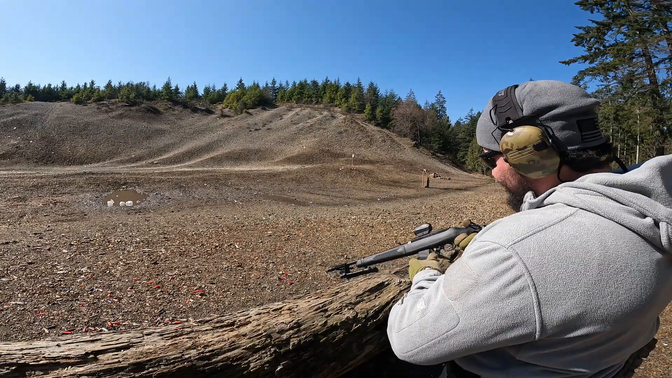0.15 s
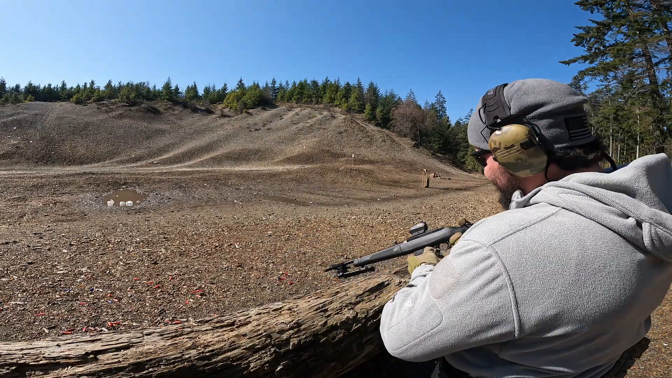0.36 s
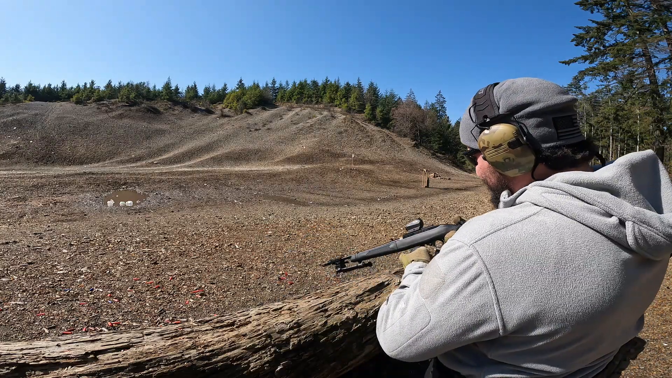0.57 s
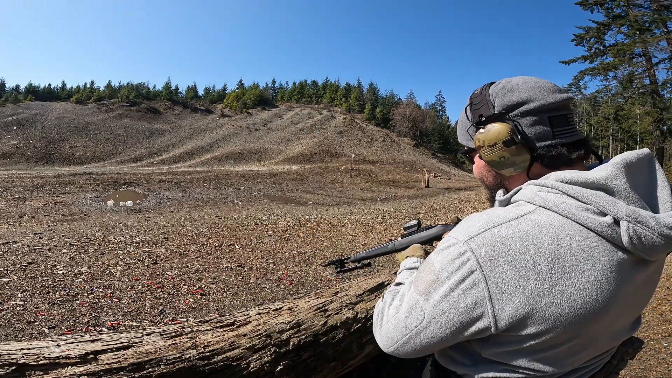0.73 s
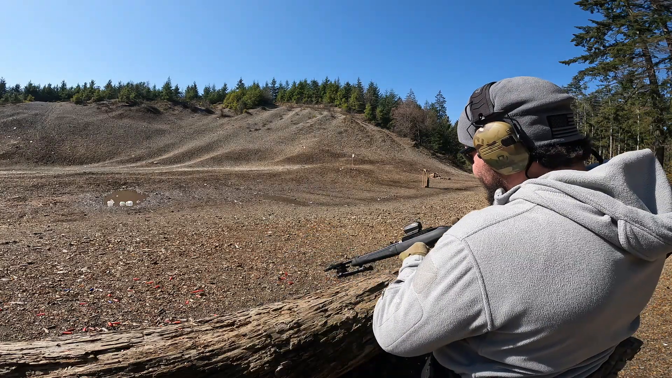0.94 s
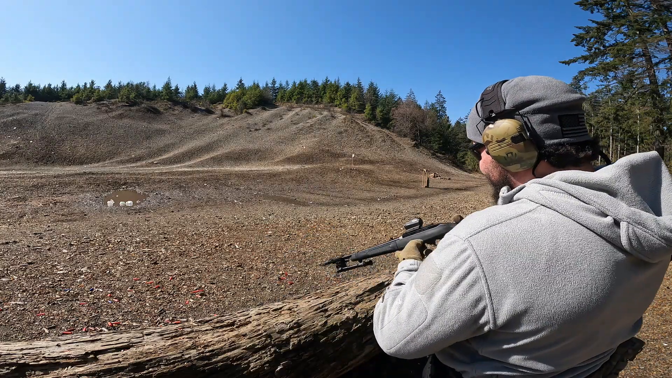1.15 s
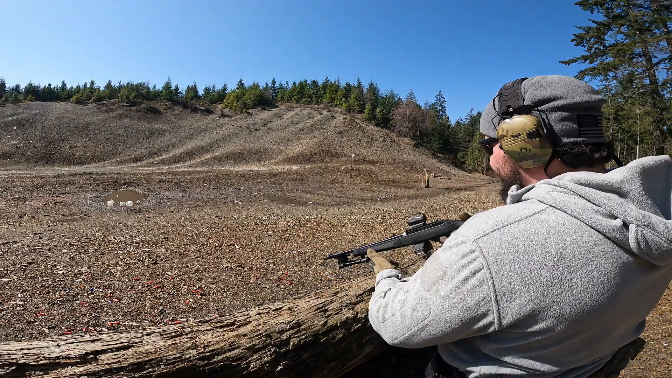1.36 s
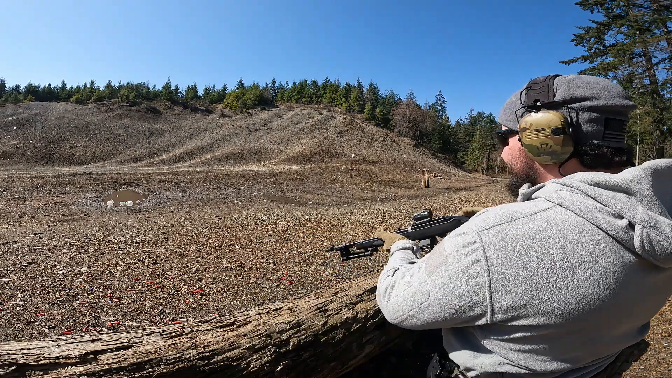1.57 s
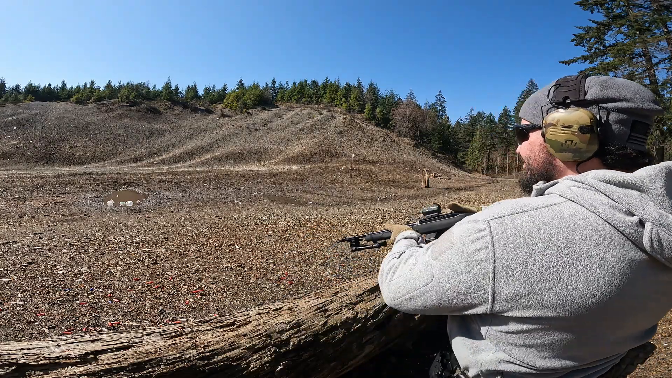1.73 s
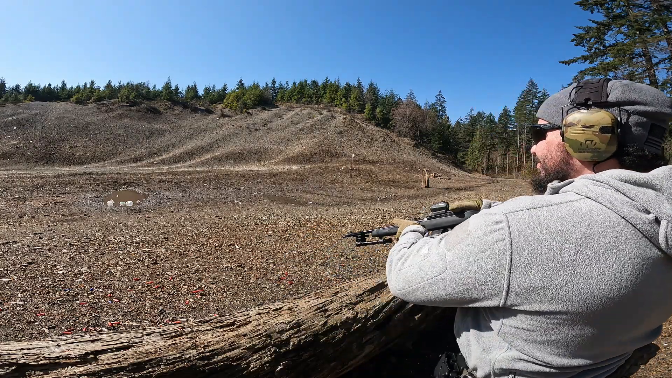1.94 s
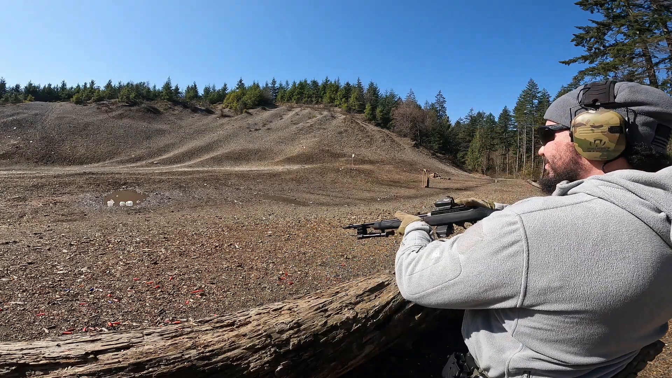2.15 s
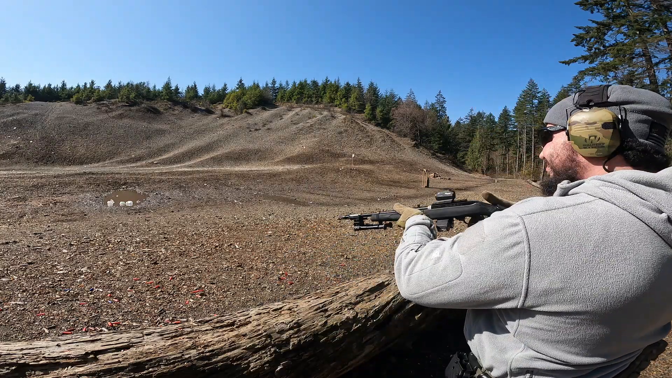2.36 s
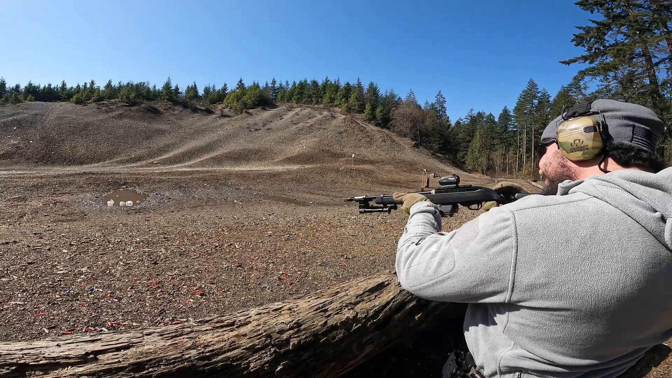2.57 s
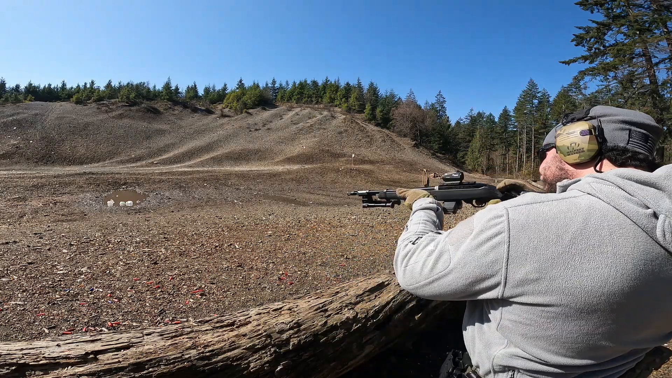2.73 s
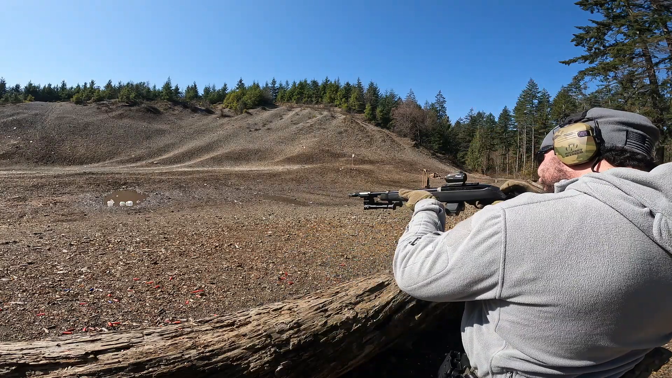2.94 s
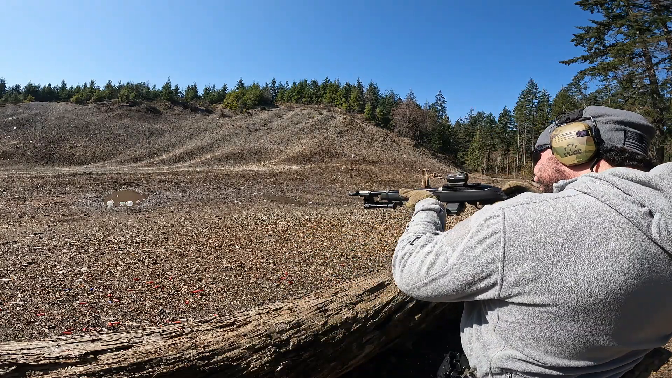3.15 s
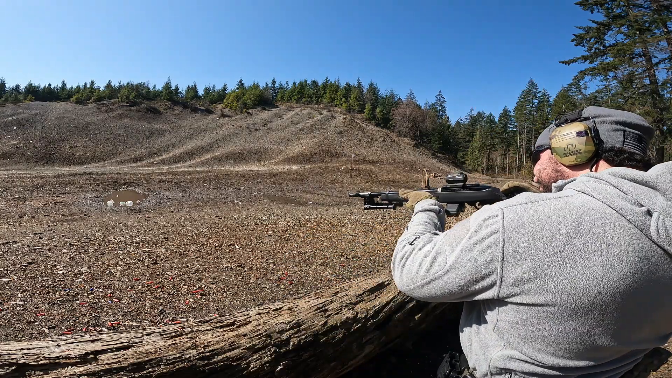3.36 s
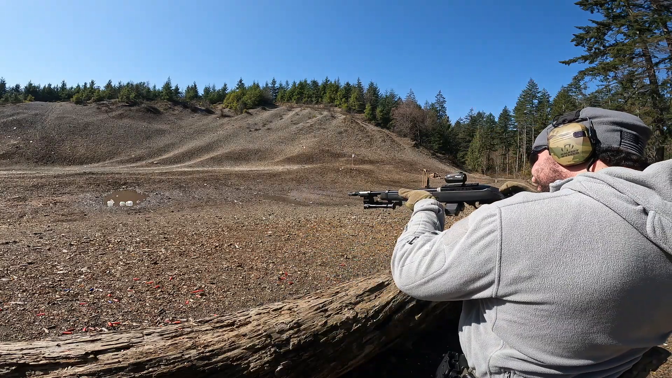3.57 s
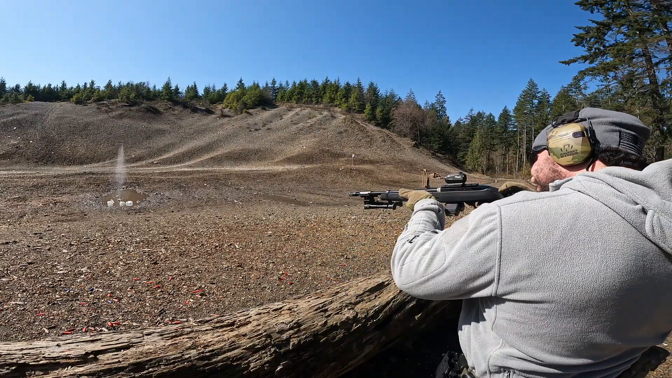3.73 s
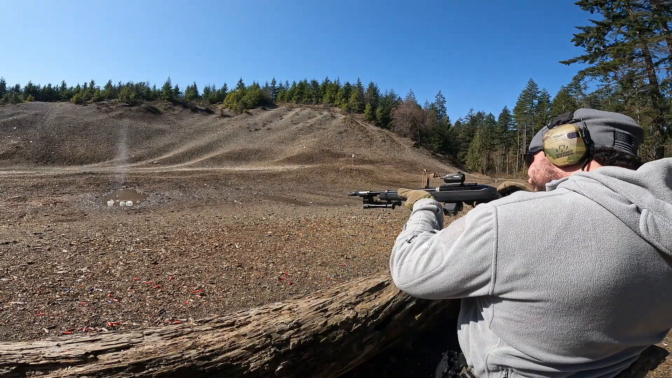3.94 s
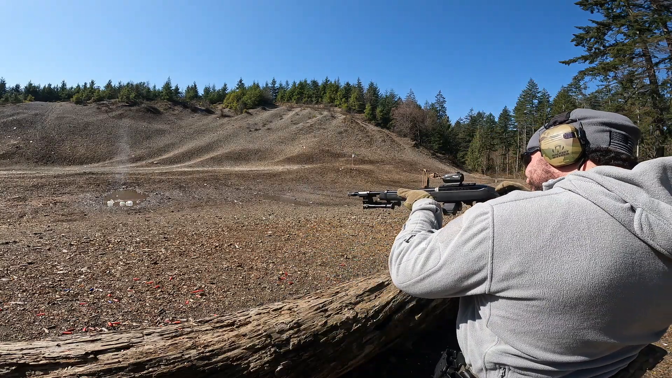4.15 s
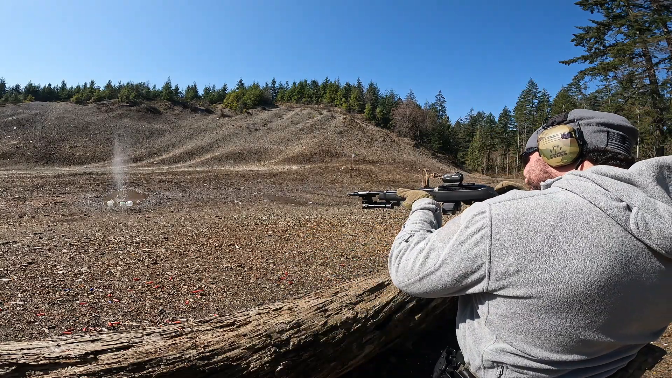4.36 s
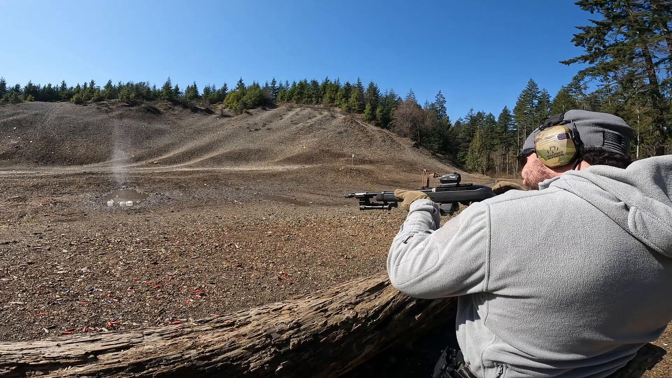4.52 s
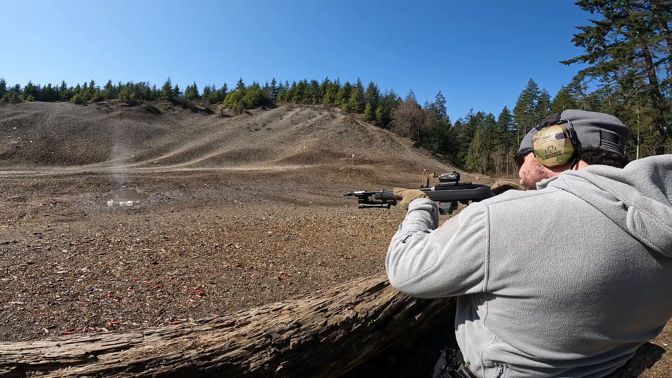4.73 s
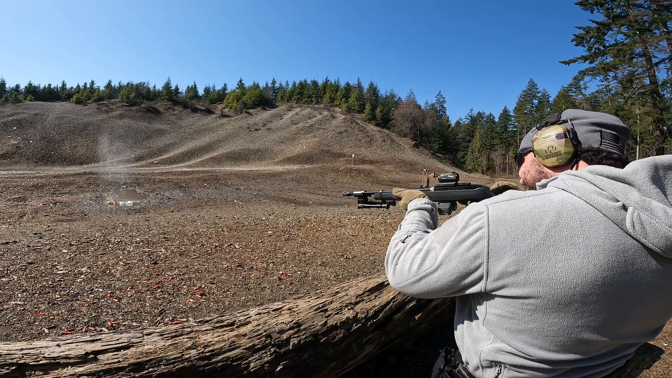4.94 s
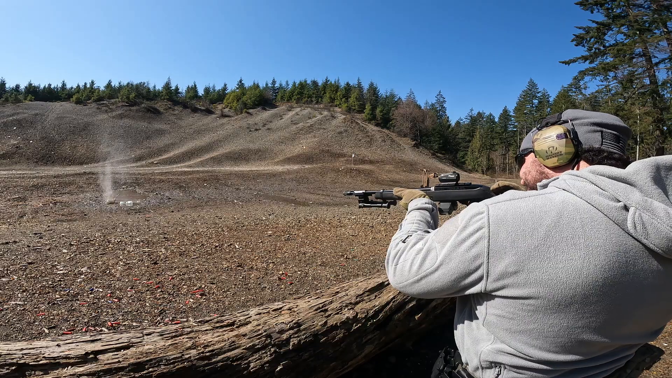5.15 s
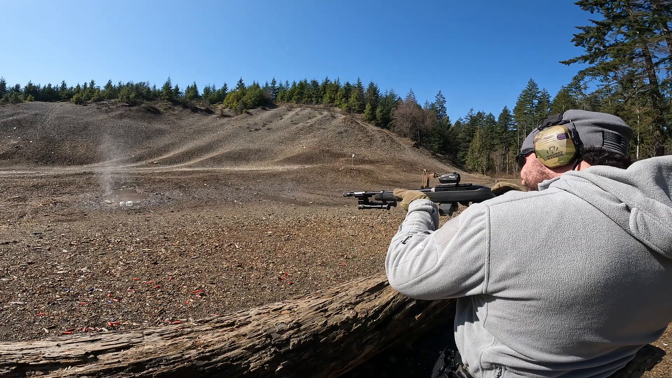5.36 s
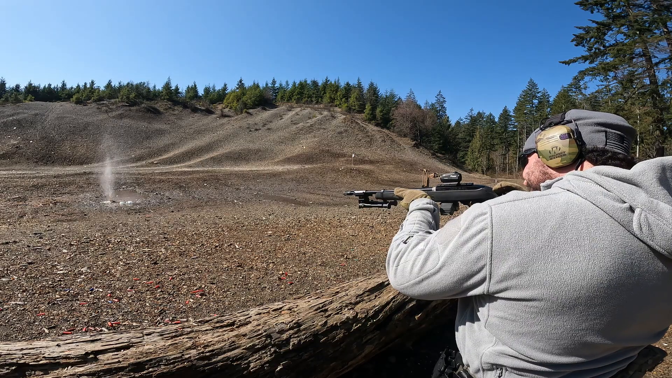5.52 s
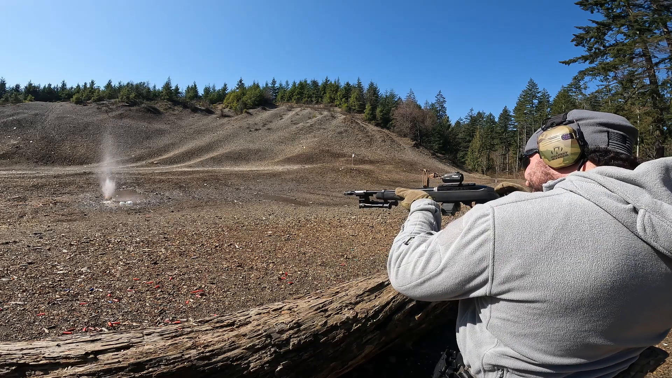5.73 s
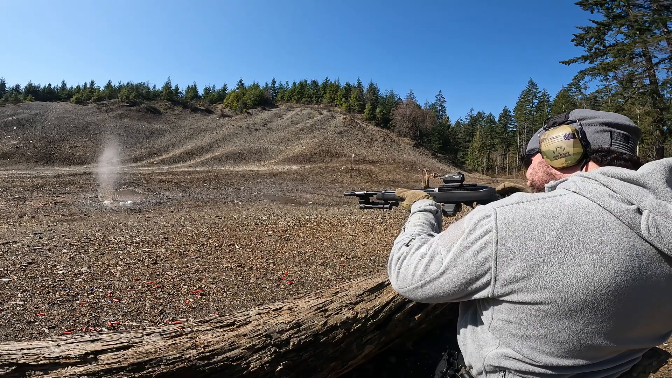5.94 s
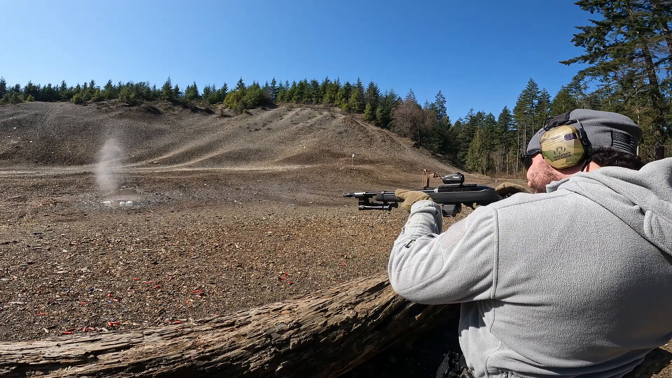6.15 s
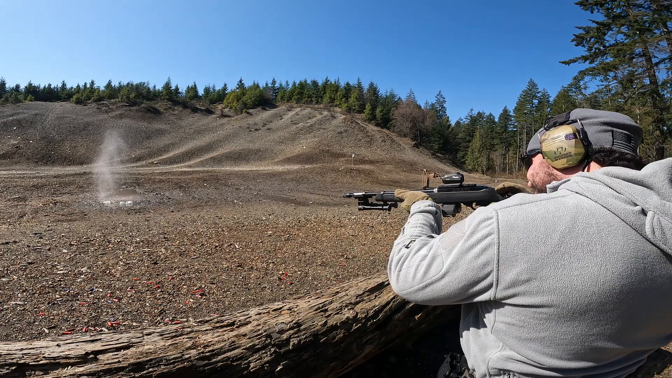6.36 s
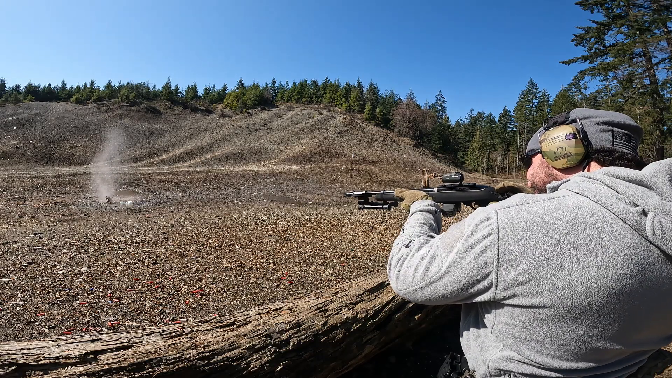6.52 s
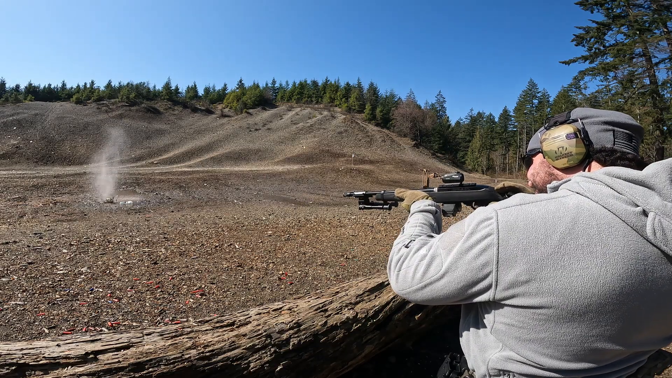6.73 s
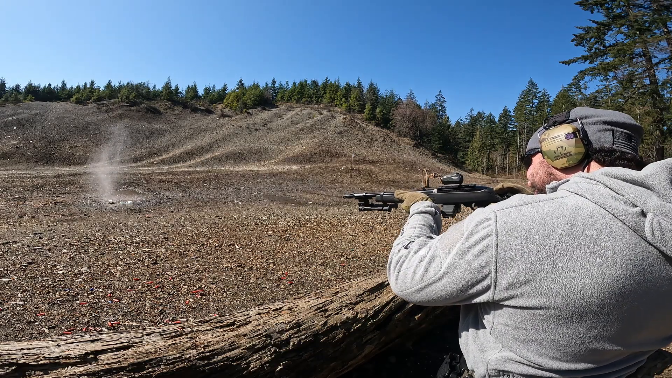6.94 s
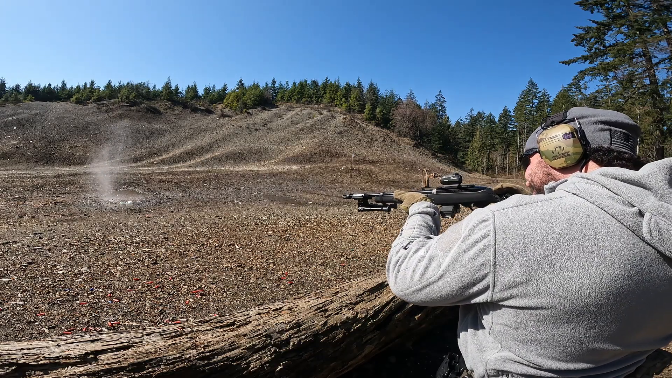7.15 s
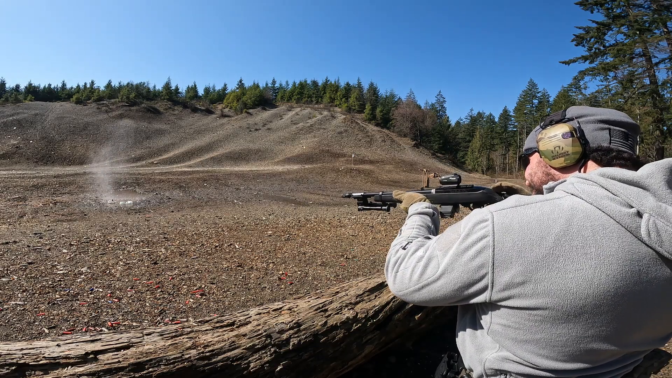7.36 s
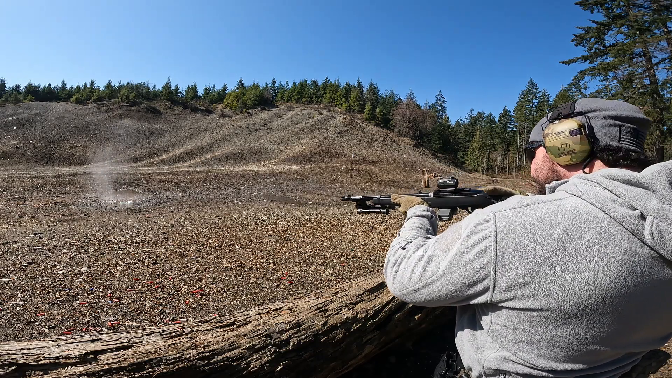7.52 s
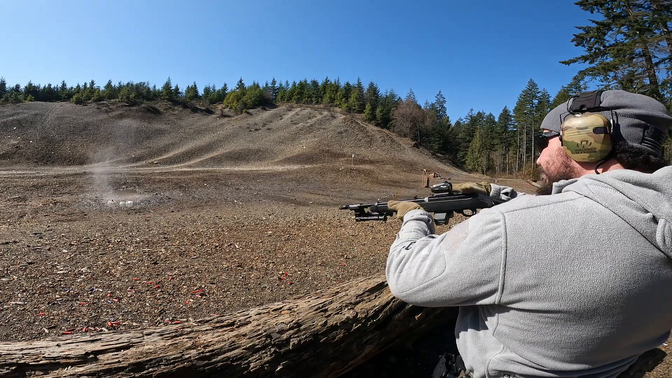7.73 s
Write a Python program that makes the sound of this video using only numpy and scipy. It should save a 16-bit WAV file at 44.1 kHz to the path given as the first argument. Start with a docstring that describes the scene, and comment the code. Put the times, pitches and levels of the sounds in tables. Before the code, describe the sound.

Steel clacks of a rifle being loaded, then ten rapid cracking shots outdoors, with bullet impacts and a long rolling echo.

```python
"""Steel clacks and sleeves rustle as a shooter loads a semi-automatic rifle. It is dragged over a log,
the bolt is racked so that its spring rings, and ten shots crack out in a gravel pit. Each blast bounces
off log and ground, the bullet's shock wave sizzles back from the gravel, and its strike slaps back from
the target some 77 ms later. Slopes and forest answer with a long roll; a light wind blows."""
import sys
import numpy as np
from scipy import signal
from scipy.fft import rfft, irfft
from scipy.io import wavfile
from scipy.ndimage import uniform_filter1d

SR = 44100
rng = np.random.default_rng(int(sys.argv[2]) if len(sys.argv) > 2 else 0)


def transcribe(u):
    """Save the signal u as a 16-bit wav file named by the first command-line argument.

    u: samples, shape (n,) or (channels, n), limited to [-1, 1]; the rate is SR.
    q: integer samples, one column per channel.
    """
    v = np.clip(np.atleast_2d(u).T, -1, 1)
    q = np.round(v * 32767).astype(np.int16)
    wavfile.write(sys.argv[1], SR, q)


N = 343539
TIME = np.arange(N) / SR

# Levels are relative within a layer; t60 is the time a sound takes to fade by 60 dB.
# the shots: t/s, blast level/dB, shock front level/dB
SHOTS = [(3.7205, -3.5, 11), (4.2852, -1, 2), (4.8428, 0, -4), (5.148, -.5, -1), (5.5036, -1, -2),
         (5.804, -0.5, -1), (6.0552, -1, 0.5), (6.2867, -1, -1.5), (6.5286, -1, -0.5), (6.7381, -1.5, 1)]
# the blast's paths, direct and off log and ground: delay/ms, level/dB, pulse length/ms, gas level/dB
BLAST_PATHS = [(0, 0.5, .4, -11), (3.3, -1, 0.46, -1.5), (6.401, 1.5, 0.7, -9)]
# low ring left by each arrival of the blast: f/Hz, level/dB, t60/s
BOOM_TONES = [(119, -10.5, 0.059), (311, -12.5, 0.022), (602, -29, 0.029)]
# bullet strikes: t/s, crack level/dB, thump delay/s, thump level/dB, thump f/Hz
STRIKES = [(3.7985, -6.5, 0.0075, -3, 189), (4.3616, -6, 0.0073, -12.5, 139),
           (4.9204, -10.5, 0.0033, -4, 237), (5.2238, -5, 0.0047, -10, 223), (5.5801, -8, 0.0081, -10, 169),
           (5.8803, -8, .009, -9, 217), (6.1324, -8, .003, -26, 104), (6.3635, -8, .003, -9, 96),
           (6.6059, -1.5, 0.0036, -6.5, 119), (6.8144, -5, 0.0055, -0.5, 378)]
# the pit's rolling echo: f/Hz, level/dB in a half octave, t60/s
ROLL_BANDS = [(60, -55, 1.2), (176, -54, 0.7), (403, -55, 4.34), (885, -45, 2.14), (1710, -43.5, 2.7),
              (2900, -40.5, 1.82), (4780, -46.5, 1.86), (7380, -42.5, 0.81), (9800, -61.5, 1.14),
              (13000, -52, 0.52)]
# clacks of magazine, bolt and safety: t/s, level/dB, tilt/dB per octave, first rebound level/dB
CLACKS = [(0.01, -16, -1.5, -13.5), (0.105, -9, -1.5, -7), (0.3163, -14.5, -4.5, -8.5),
          (0.42, -18.5, -6, -18), (0.449, -16.5, -3, -6), (0.89, -17.5, -5.5, 2), (0.898, -8, -2, -17),
          (0.927, -13.5, 1.5, -42), (1.566, -34.5, -5, 1.5), (1.95, -18.5, 1, -15.5), (2.034, -28, -5, -22),
          (2.185, -32.5, -5, 6), (2.228, -12.5, -1, -13), (2.377, -23.5, -3.5, -1.5),
          (2.442, -12.5, -2, -27.5), (6.956, -9.5, -2.4, -31), (6.965, -25, -3, -20)]
# bolt strokes: stop t/s, stop level/dB, tilt/dB per octave, slide length/s, slide level/dB,
# spring level/dB
BOLT_STROKES = [(2.2654, -4, -3, 0.0015, -23, -7.5), (2.4253, 0.5, -0.5, 0.012, -24.5, 3)]
# hollow ring of the rifle's body and magazine: f/Hz, level/dB, t60/s
BODY_TONES = [(1133, -36.5, 0.028), (1550, -48, .025), (2010, -37.5, 0.012), (3440, -41.5, 0.019),
              (4050, -46, .025), (5414, -39, 0.021)]
# ringing tones of the recoil spring: f/Hz, level/dB, t60/s
SPRING_TONES = [(5170, -66, .9), (5265, -63, .9), (5400, -64, .8), (5560, -67, .8), (10535, -57, .85),
                (13469, -69, .75)]
# knocks of the rifle on the log: t/s, level/dB
LOG_KNOCKS = [(1.729, -18), (1.776, -23.5), (1.79, -20.5), (1.873, -21), (1.922, -10.5), (1.933, -13)]
# faint, dull taps: t/s, level/dB
TAPS = [(3.429, -36), (3.585, -40.5), (7.587, -45)]
# arm moves that rustle sleeves and gloves: t/s, length/s, level/dB
ARM_MOVES = [(0, 0.032, -59.5), (.5, 0.1, -64), (1.33, 0.035, -65.5), (1.65, 0.91, -67),
             (2.5, 0.078, -67.5)]
# gusts on the microphone: t/s, length/s, level/dB
GUSTS = [(.04, 0.066, -43), (.29, 0.17, -38), (.59, 0.12, -24.5), (.92, .13, -37.5), (1.85, 0.12, -50),
         (2.3, 0.24, -51), (2.95, 0.34, -55)]

# Spectra, which say how strong a sound is from low to high: f/Hz, level/dB
GAS_SPECTRUM = [(150, -2), (400, -1.5), (900, -7), (2000, -0.5), (3200, -4.5), (4500, -9.5), (7200, -13),
                (8500, -19), (10500, -22), (12300, -27), (15000, -45.5)]  # gas leaving the muzzle
SIZZLE_SPECTRUM = [(50, -17), (200, -3.5), (480, -14), (800, -4.5), (1600, -1), (3000, 2), (5000, -8),
                   (7500, -13.5), (8600, -23), (11000, -28.5), (12300, -21), (15000, -36)]  # shock wave scattered by gravel
STRIKE_SPECTRUM = [(200, -6.5), (900, -11.5), (1700, -4), (2700, 2.5), (3600, -4), (5000, -17.5),
                   (7500, -17.5), (9000, -31.5), (12500, -36), (15000, -52)]  # crack and spray where the bullet lands
EARTH_SPECTRUM = [(30, 2), (120, 1.5), (450, -5.5), (800, -17), (3000, -85)]  # struck earth
STEEL_SPECTRUM = [(150, -44.5), (250, -17), (335, -20.5), (614, -14), (705, -14.5), (945, -7), (1410, -5),
                  (2130, -4.5), (2440, -6.5), (3390, -5), (4390, -6), (5130, -2.5), (8770, -13.5),
                  (12600, -18), (15500, -63)]  # the rifle's steel parts
WOOD_SPECTRUM = [(47, -42), (80, -12), (286, -4.5), (319, -8), (547, 1.5), (791, -3), (1120, 1.5),
                 (2540, -11), (2770, -17.5), (9090, -32.5), (14000, -54)]  # the log
TAP_SPECTRUM = [(400, -13), (800, -15.5), (1020, 13.5), (1400, 1), (1900, -26), (6000, -34.5), (12000, -69)]  # a dull tap
CLOTH_SPECTRUM = [(800, -18), (2000, 6), (4000, -5), (5500, -2), (7500, -4.5), (9000, -14.5),
                  (12300, -15.5), (14000, -27.5)]  # rubbing cloth
GUST_SPECTRUM = [(15, 5.5), (40, 0.5), (80, -12), (150, -19.5), (400, -42), (2000, -88)]  # wind hitting the microphone
FOREST_SPECTRUM = [(59, -56.5), (100, -22.5), (118, -20.5), (134, -15.5), (176, -4.5), (257, -14),
                   (285, -18), (383, -17.5), (607, -21.5), (831, -22), (904, -18.5), (983, -17.5),
                   (1460, -22.5), (2520, -54.5), (15000, -64.5)]  # far-off trees in the wind


def muzzle_blasts():
    """A steep pressure pulse with a puff of gas noise and a low ring arrives by three paths."""
    pulses, gas, t = np.zeros((2, N)), np.zeros((2, N)), TIME[:SR // 8]
    ring = sum(undb(db) * np.sin(2 * np.pi * hz * t) * fade(t, t60) for hz, db, t60 in BOOM_TONES)
    puff = noise(len(t), -33) * fade(t, 0.0071)  # one muzzle: every shot has the same grain
    lead_s, shock_width_s = 0.0004, 0.00008
    shock_age = (t - lead_s) / shock_width_s
    shock = -shock_age * np.exp(-shock_age ** 2 / 2)
    for s, blast_db, front_db in SHOTS:
        for delay_ms, db, length_ms, gas_db in BLAST_PATHS:
            age = t * 1000 / length_ms
            arrival_s = s + delay_ms / 1000
            pulse = (1 - age) * np.exp(-age) * (1 - np.exp(-t / 0.00005))
            add(pulses, arrival_s, undb(blast_db + db) * (ring - pulse))
            add(gas, arrival_s, undb(blast_db + gas_db) * puff)
        # the shock front is the brightest part
        add(pulses, s - lead_s, undb(front_db - 3.5) * shock)
        bright_hiss = np.diff(noise(len(t) + 1, -4))
        add(gas, s - lead_s, undb(front_db) * bright_hiss * fade(t, 0.0038))
    return pulses + colour(gas, GAS_SPECTRUM)


def blast_rush():
    """A rush of noise swells into each shot and dies quickly, with a tick just ahead of the blast."""
    lead_s, rise_s, hold_s, tick_lead_s = 0.05, 0.018, 0.0018, 0.009
    out, t = np.zeros((2, N)), TIME[:SR // 8] - lead_s
    swell = np.where(t < 0, np.exp(-(t / rise_s) ** 2), fade(np.maximum(t - hold_s, 0), 0.058))
    tick = fade(t + tick_lead_s, 0.019)
    envelope = np.hypot(undb(-16) * swell, undb(-9) * tick)
    shared = noise(len(t), -8)  # half of the grain is the same every time
    for s, blast_db, _ in SHOTS:
        grain = (shared + noise(len(t), -12.5)) / np.sqrt(2)
        add(out, s - lead_s, undb(blast_db) * grain * envelope)
    return colour(out, GAS_SPECTRUM)


def bullets():
    """Stones scatter the bullet's shock wave; it lands with a crack, a spray of gravel and a thump."""
    out, t = np.zeros((2, N)), TIME[:SR // 5]
    for (s, blast_db, front_db), strike in zip(SHOTS, STRIKES):
        strike_s, crack_db, delay_s, thump_db, thump_hz = strike
        since_hit = t - (strike_s - s)
        stones = undb(3.6 * wobble(len(t), size=30))
        flight = fade(np.maximum(since_hit, 0), 0.033)  # full until the bullet lands
        sizzle = noise(len(t), -12) * stones * undb(blast_db - 27.5) * flight
        crack = undb(crack_db - 3.5) * arch(since_hit, hold_s=0, rise_s=0.0099, fall_s=0.0084)
        spray = undb(blast_db - 18.5) * arch(since_hit, hold_s=0, rise_s=0.068, fall_s=0.067)
        rumble = undb(-15.5) * noise(len(t), -11) * fade(since_hit, 0.036)
        impact = noise(len(t), -13.5) * np.hypot(crack, spray)
        tilt_db = 0.19 * (front_db + 5.5)  # a sharper shock scatters more treble
        add(out, s, colour(sizzle, SIZZLE_SPECTRUM, tilt_db) + colour(rumble, EARTH_SPECTRUM))
        add(out, s, colour(impact, STRIKE_SPECTRUM, tilt_db))
        out += undb(crack_db + 2) * swing(strike_s, hz=3070, cycles=1)  # sharp slap inside the crack
        landed = np.clip((TIME - strike_s) / 0.00015, 0, 1)
        out += undb(thump_db) * swing(strike_s + delay_s, thump_hz, cycles=0.84) * landed
    return out


def pit_echo():
    """The bank behind the target slaps back once, dully; then slopes and trees build up a long roll."""
    bank_s, bank_width_s, bank_top_hz = 0.11, 0.013, 3580
    slopes_start_s, slopes_rise_s = 0.13, 0.18
    sink_from_hz, sink_to_hz, sink_s = 4100, 1023, 0.34
    t = TIME[:3 * SR]
    hz, db, t60 = np.transpose(ROLL_BANDS)
    octave = np.log2(np.maximum(np.fft.rfftfreq(len(t), 1 / SR), 1))
    # later echoes come from farther and sound lower, as the air swallows the treble first
    sinking = np.log2(sink_to_hz + (sink_from_hz - sink_to_hz) * np.exp(-t / sink_s))
    bank = undb(6.5) * np.exp(-((t - bank_s) / bank_width_s) ** 2)
    slopes = undb(4) * np.sqrt(1 - np.exp(-np.maximum(t - slopes_start_s, 0) / slopes_rise_s))
    scatter, echo = rfft(noise(len(t), -9.5)), 0
    for centre in np.arange(5.5, 14, 0.5):  # octaves above 1 Hz
        window = np.cos(np.pi / 2 * np.clip(2 * (octave - centre), -1, 1)) ** 2
        band = irfft(scatter * window)
        band *= undb(1.2 * wobble(len(t), size=1500))  # each stretch of slope has its own colour
        band *= undb(3 * np.exp(-(centre - sinking) ** 2))
        arrival = bank / np.hypot(1, (2 ** centre / bank_top_hz) ** 2) + slopes
        level = undb(np.interp(centre, np.log2(hz), db))
        decay = fade(t, np.interp(centre, np.log2(hz), t60))
        echo += band / band.std() * arrival * level * decay
    echo *= undb(1.6 * wobble(len(t), size=441))
    out = np.zeros((2, N))
    for s, *_ in SHOTS:
        add(out, s, echo)
    return out


def thump_echoes():
    """Each thump rolls back from the far bank; a louder, higher thump gives a louder, higher roll."""
    delay_s, width_s, pitch_ratio = 0.14, 0.11, 1.09
    out, t = np.zeros((2, N)), TIME[:SR // 2]
    envelope = np.exp(-((t - delay_s) / width_s) ** 2)
    for s, _, _, thump_db, thump_hz in STRIKES:
        hz = pitch_ratio * thump_hz
        spectrum = [(hz / 4, -22), (hz, 0), (hz * 2, -12), (hz * 10, -60)]
        add(out, s, undb(thump_db - 36.5) * colour(noise(len(t), -32) * envelope, spectrum))
    return out


def steel_parts():
    """Steel parts snap, rebound, slide and slam, ringing the rifle's body a little to the right."""
    rebound_s, rebound_loss_db = 0.019, 5
    out, t = np.zeros((2, N)), TIME[:SR // 2]
    snap = fade(t, 0.007) + undb(-15) * fade(t, 0.063) + undb(-57.5) * fade(t, 1.0)
    snap *= 1 - np.exp(-(t / 0.0019) ** 2)  # soften the start
    for s, db, tilt_db, rebound_db in CLACKS:
        for bounce, bounce_db in enumerate([0, rebound_db, rebound_db - rebound_loss_db]):
            clack = colour(noise(len(t), -11) * snap, STEEL_SPECTRUM, tilt_db)
            add(out, s + bounce * rebound_s, undb(db + bounce_db) * clack)
    slam = fade(t, 0.011) + undb(-58) * fade(t, 1.0)
    slam *= 1 - np.exp(-(t / 0.0011) ** 2)
    for s, db, tilt_db, slide_s, slide_db, _ in BOLT_STROKES:
        slide = arch(TIME - s + slide_s, slide_s, rise_s=0.034, fall_s=0.046)
        slide *= undb(slide_db + 2 * wobble(N, size=50))
        out += colour(noise(N, -9) * slide, STEEL_SPECTRUM, tilt_db=-2)
        add(out, s, undb(db) * colour(noise(len(t), -9.5) * slam, STEEL_SPECTRUM, tilt_db))
    body = sum(undb(db) * np.cos(2 * np.pi * hz * t) * fade(t, t60) for hz, db, t60 in BODY_TONES)
    out += signal.fftconvolve(out, body[None], axes=1)[:, :N]
    return out * undb([[-0.9], [0.9]])


def recoil_spring():
    """The spring sings on after each bolt stroke; every tone swells in and shimmers."""
    out, t = np.zeros((2, N)), TIME[:SR]
    swell = 1 - np.exp(-t / 0.02)
    for s, *_, spring_db in BOLT_STROKES:
        for hz, db, t60 in SPRING_TONES:
            shimmer = np.array([undb(2.5 * wobble(len(t), size=600)) for _ in range(2)])
            tone = np.sin(2 * np.pi * hz * t) * fade(t, t60)
            add(out, s, undb(spring_db + db) * shimmer * tone * swell)
    return out


def rifle_on_log():
    """The rifle knocks on the log, and catches and slips on the rough bark in one push."""
    grit = undb(5.7 * wobble(N, size=60))
    push = undb(-32) * arch(TIME - 1.9085, hold_s=0.024, rise_s=0.34, fall_s=0.24)
    out = noise(N, -13) * grit * push
    t = TIME[:SR // 10]
    click = t == 0
    for s, db in LOG_KNOCKS:
        add(out, s, undb(db) * (click + 0.24 * noise(len(t), -15) * fade(t, 0.036)))
    return colour(out, WOOD_SPECTRUM)


def taps():
    """A few faint, dull taps: short bursts of noise that rise fast and fade more slowly."""
    envelope = np.zeros(N)
    for s, db in TAPS:
        since_peak = TIME - s - 0.004
        envelope += undb(db) * (fade(since_peak, 0.14) + fade(-since_peak, 0.03))
    return colour(noise(N, -9.5) * envelope, TAP_SPECTRUM)


def clothing():
    """Cloth brushes softly and unevenly with each move, and settles to a smooth hiss at rest."""
    rest_db = -78.5
    moving = spells(ARM_MOVES, rest_db, rise_s=0.6, fall_s=1)
    unevenness = 1.5 - undb(rest_db) / moving
    folds = undb(3.8 * wobble(N, size=500) * unevenness)
    return colour(noise(N, -4.5), CLOTH_SPECTRUM) * moving * folds


def breeze():
    """The forest rustles far off; gusts flutter on the microphone and the strongest bumps it."""
    forest = colour(noise(N, -11), FOREST_SPECTRUM) * undb(-55.5)
    gusts = colour(noise(N, -4), GUST_SPECTRUM) * spells(GUSTS, rest_db=-56, rise_s=0.16, fall_s=0.3)
    bump = undb(-14) * swing(0.58, hz=63, cycles=0.48)
    return forest + gusts + bump


def undb(db):
    """Turn decibels into a factor to multiply by."""
    return 10 ** (np.asarray(db) / 20)


def noise(count, side_db):
    """Stereo white noise; side_db is the level of the part that differs between left and right."""
    mid, side = rng.standard_normal((2, count))
    return np.array([mid + undb(side_db) * side, mid - undb(side_db) * side])


def colour(x, spectrum, tilt_db=0):
    """Filter a sound through a spectrum, tilted by tilt_db per octave; white noise keeps its power."""
    size = 4096
    octave = np.log2(np.maximum(np.fft.rfftfreq(size, 1 / SR), 1))
    hz, db = np.transpose(spectrum)
    tilt = tilt_db * np.maximum(octave, np.log2(hz[0]))
    gain = undb(np.interp(octave, np.log2(hz), db) + tilt)
    gain /= np.sqrt(np.mean(gain ** 2))
    # fold the filter so that it rings only after a sound, never before it
    cepstrum = irfft(np.log(gain + 1e-9))
    cepstrum[1:size // 2] *= 2
    cepstrum[size // 2 + 1:] = 0
    response = irfft(np.exp(rfft(cepstrum)))
    return signal.fftconvolve(x, response[None], axes=1)[:, :x.shape[1]]


def swing(s, hz, cycles):
    """A short swing of pressure centred on time s; more cycles make it last longer."""
    turns = (TIME - s) * hz
    near = np.abs(turns) < 2 * np.pi
    out = np.zeros(N)
    out[near] = -np.cos(2 * np.pi * turns[near]) / np.cosh(np.pi * turns[near] / cycles)
    return out


def wobble(count, size):
    """Random values that glide to a new one every size samples."""
    return uniform_filter1d(np.repeat(rng.standard_normal(count // size + 1), size), size)[:count]


def fade(t, t60):
    """A level that starts at t = 0 and drops 60 dB every t60 seconds."""
    return (t >= 0) * undb(-60 * np.maximum(t, 0) / t60)


def arch(t, hold_s, rise_s, fall_s):
    """A level that rises, stays full from t = 0 for hold_s, then falls; rise and fall are per 60 dB."""
    return undb(-60 * (np.maximum(-t, 0) / rise_s + np.maximum(t - hold_s, 0) / fall_s))


def spells(rows, rest_db, rise_s, fall_s):
    """A resting level with one swell for each row of t/s, length/s, level/dB."""
    power = sum((undb(db) * arch(TIME - s, length, rise_s, fall_s)) ** 2 for s, length, db in rows)
    return np.sqrt(undb(rest_db) ** 2 + power)


def add(out, s, sound):
    """Mix a sound into out, starting at s seconds."""
    start = max(int(round(s * SR)), 0)
    part = sound[..., :N - start]
    out[:, start:start + part.shape[-1]] += part


def scene():
    """Everything as it reaches the microphone beside the shooter."""
    shots = muzzle_blasts() + blast_rush() + bullets() + pit_echo() + thump_echoes()
    return shots + steel_parts() + recoil_spring() + clothing() + rifle_on_log() + taps() + breeze()


def record(dry):
    """The stereo narrows after the first shot; deep bass is thinned, peaks rounded and the top cut."""
    narrow_from_s, narrow_db_per_s, narrowest_db = 4.14, -60, -42
    bottom_hz, top_hz = 18, 15400
    mid = dry.mean(axis=0)
    width = undb(np.clip(narrow_db_per_s * (TIME - narrow_from_s), narrowest_db, 0))
    narrowed = mid + (dry - mid) * width
    thinned = signal.sosfilt(signal.butter(1, bottom_hz, "high", fs=SR, output="sos"), narrowed)
    rounded = 0.99 * np.tanh(thinned / 1.144)
    return signal.sosfilt(signal.ellip(10, 0.2, 80, top_hz, fs=SR, output="sos"), rounded)


dry = scene()
out = record(dry)
transcribe(out)
```